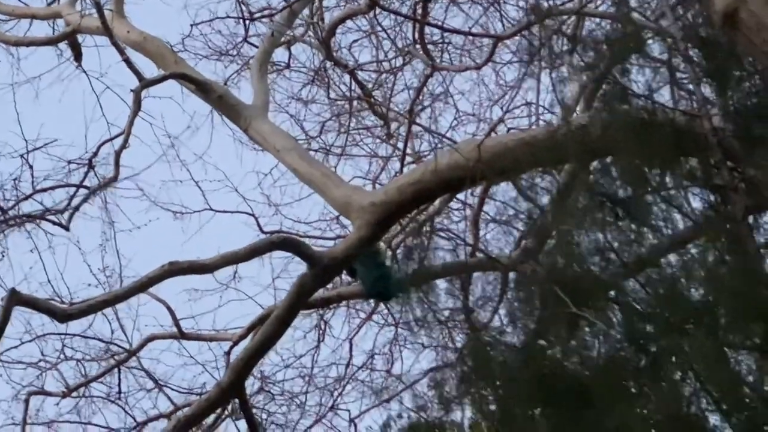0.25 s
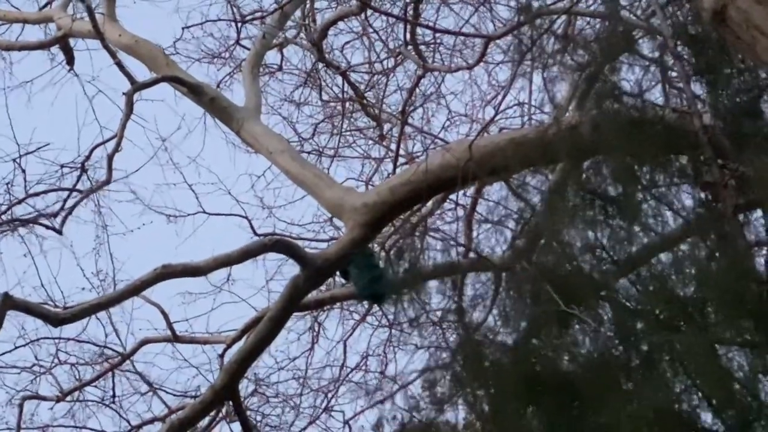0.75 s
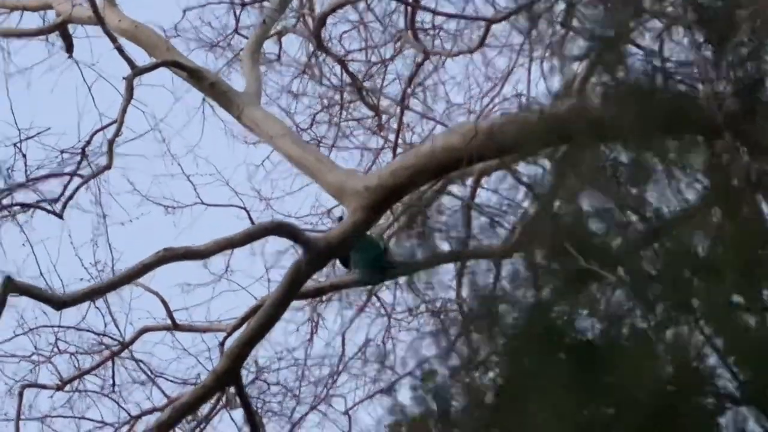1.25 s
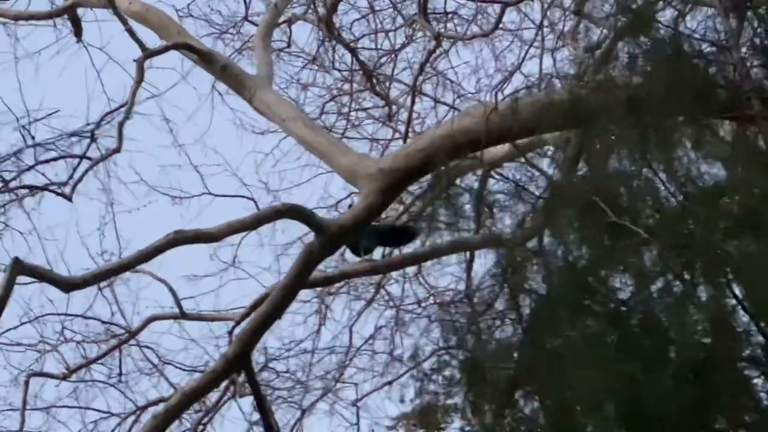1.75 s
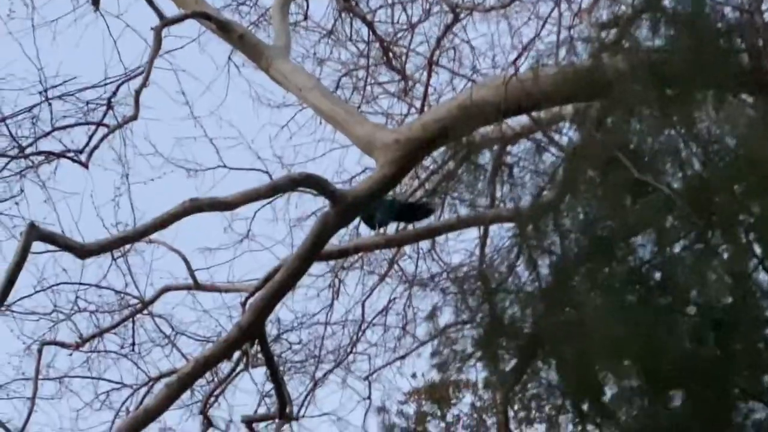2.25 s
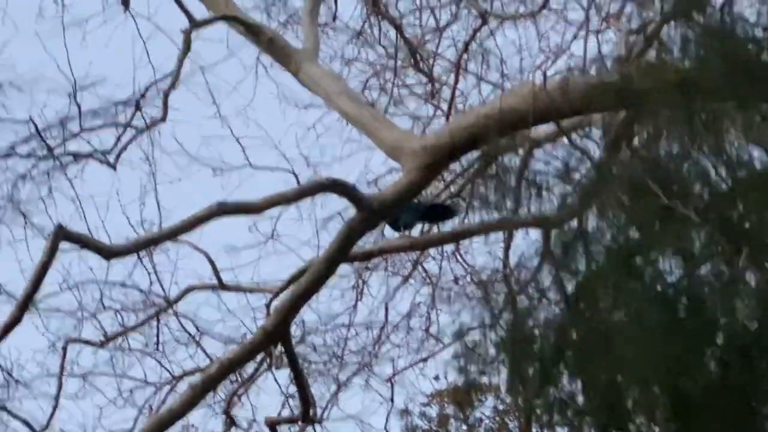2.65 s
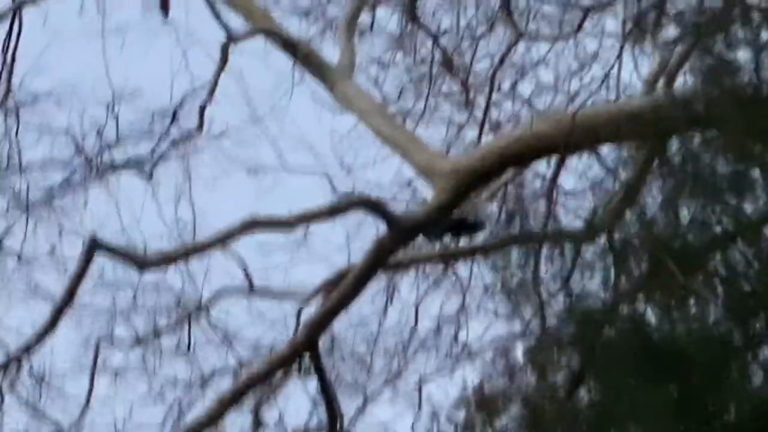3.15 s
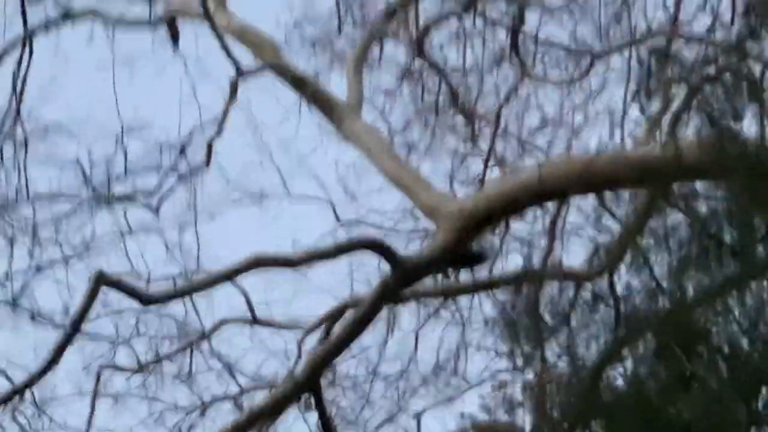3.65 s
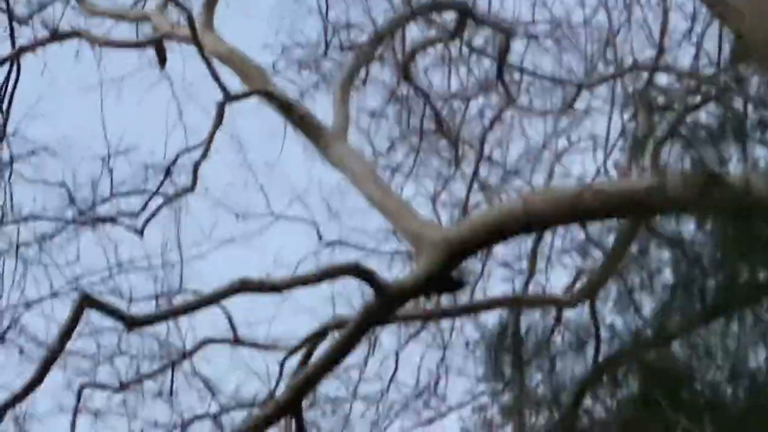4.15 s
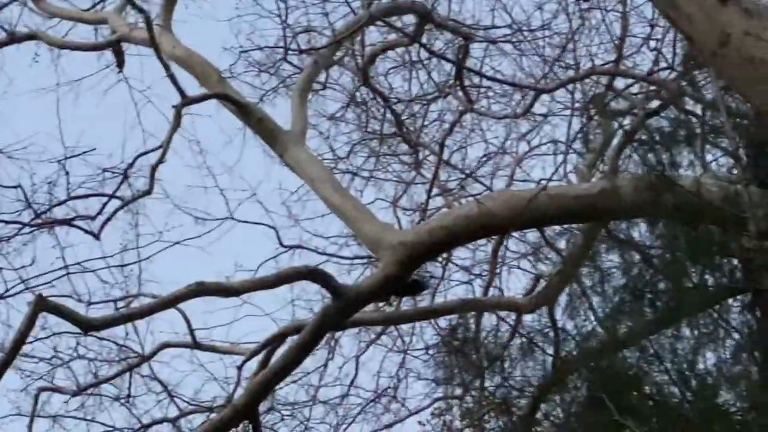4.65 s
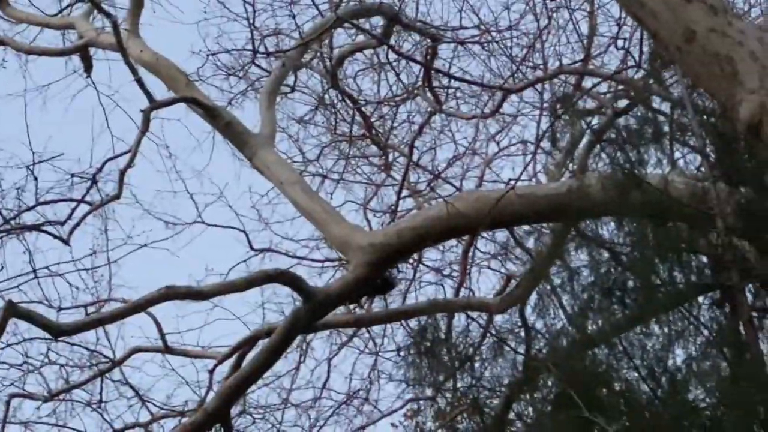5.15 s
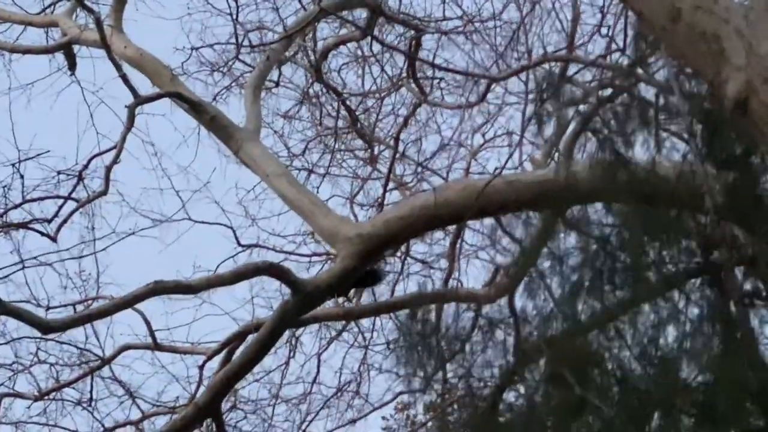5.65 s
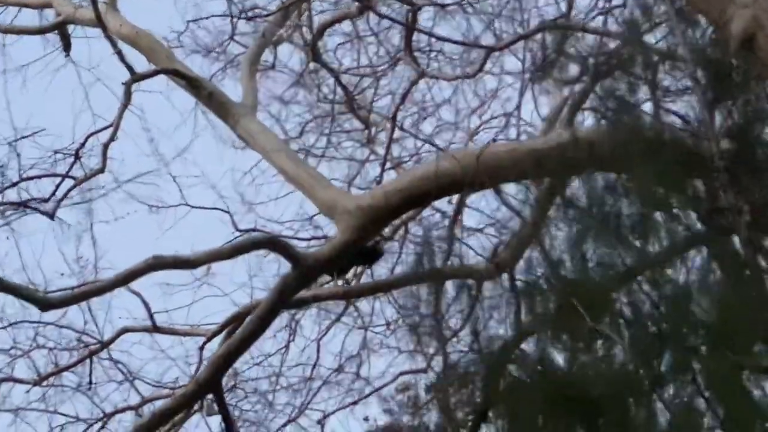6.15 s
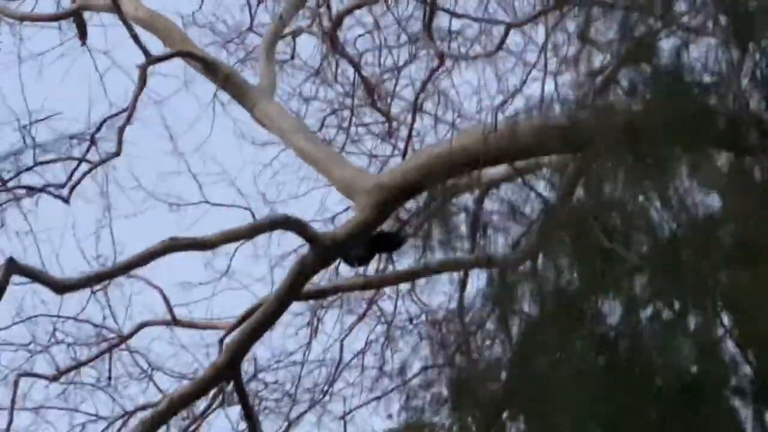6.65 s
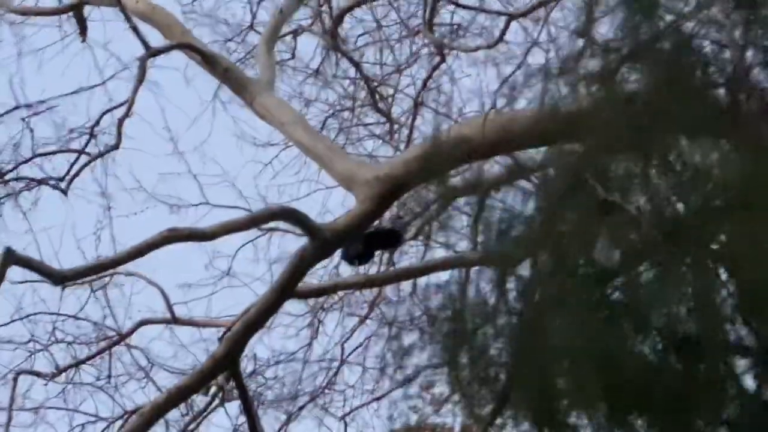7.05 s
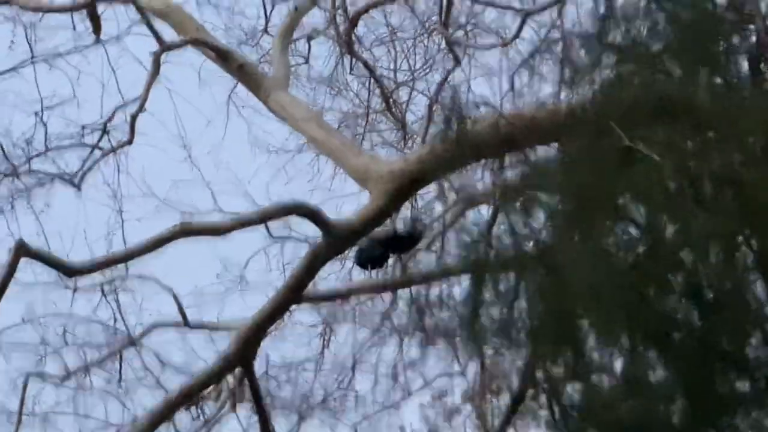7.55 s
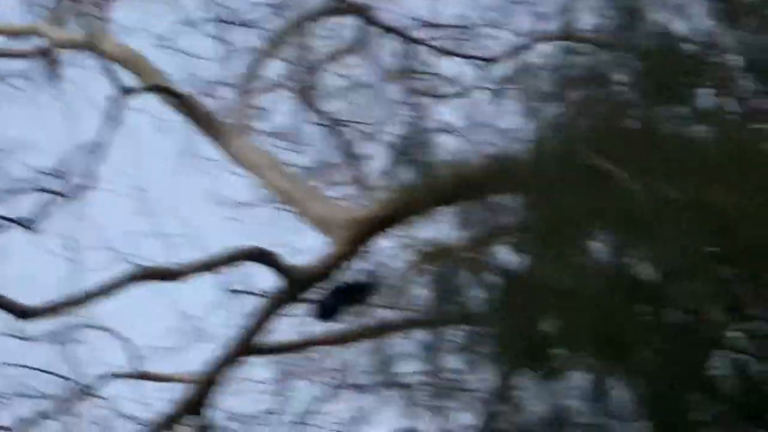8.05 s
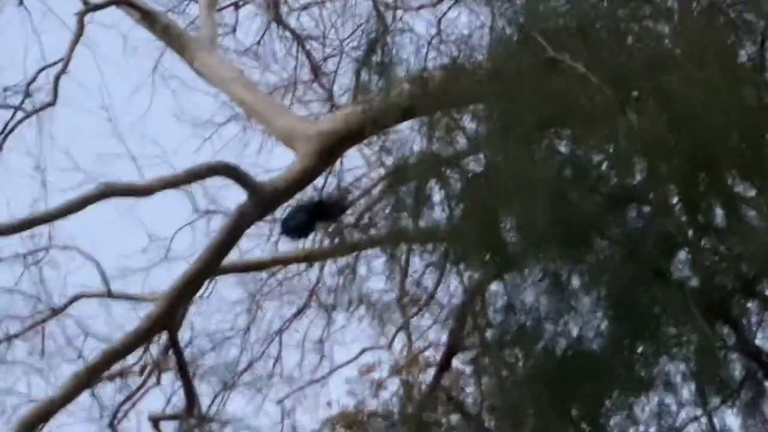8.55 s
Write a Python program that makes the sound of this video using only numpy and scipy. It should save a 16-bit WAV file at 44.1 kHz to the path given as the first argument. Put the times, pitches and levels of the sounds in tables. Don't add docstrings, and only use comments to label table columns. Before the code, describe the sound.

A peacock high in a bare tree calls loudly: a brief rattling start, one long falling wail, then six shorter nasal cries that break upward and drop, about one each second. Close trunks give quick echoes and a slope a faint late tail. Distant water hisses softly over low rumble. The hand-held camera's plastic case knocks, ticks and creaks very close in stereo.

```python
import sys
import numpy as np
from scipy import signal
from scipy.fft import rfft, irfft, next_fast_len
from scipy.io import wavfile
from scipy.ndimage import uniform_filter1d, map_coordinates

SR = 44100
rng = np.random.default_rng(int(sys.argv[2]) if len(sys.argv) > 2 else 0)


def attenuation_scalar(level_db):
    decades = np.asarray(level_db, float) / 20
    return 10 ** decades


def unload_audio(sound):
    columns = np.transpose(np.atleast_2d(sound))
    steps = np.round(np.clip(columns, -1, 1) * 32767)
    wavfile.write(sys.argv[1], SR, steps.astype(np.int16))


N = 388080

# t/s, level/dB
RUMBLE_LEVEL = [(0.0, -57.5), (1.35, -54.5), (1.62, -53), (2.15, -55.5), (3.5, -54), (5.1, -57),
                (5.2, -54.5), (7.38, -54), (7.67, -51), (7.94, -55.5), (8.48, -53.5), (8.8, -55)]
# f/Hz, level/dB
RUMBLE_SPECTRUM = [(12, -48), (20, -27), (38, -7.5), (57, 3), (75, 6.5), (119, 0.5), (236, -12.5),
                   (260, -12), (340, -31), (570, -120)]
WATER_SPECTRUM = [(90, -25), (170, -1), (630, 3), (1000, -4), (2000, -10.5), (2600, -16), (4000, -24),
                  (6300, -40.5), (10000, -48.5), (12500, -58), (13500, -80.5)]
CLOTH_SPECTRUM = [(2650, -32), (4500, -5), (5820, -7.5), (7700, -4), (8380, -12), (11000, -12.5),
                  (13000, -29)]
# t/s, level/dB
SLEEVE_LEVEL = [
    (0.62, -103),
    (0.674, -72.5),
    (1.03, -77),
    (1.04, -82),
]
# f/Hz, likeness/1
AIR_ALIKE = [(30, .88), (60, 1), (130, 0.81), (290, 0.8), (640, 0.044), (1400, 0.48), (2200, 1),
             (4000, 0.77), (12000, 0.88)]
# t/s, shell peak level/dB, left over right/dB
THUDS = [(.865, -48, 18), (1.061, -32.5, 6), (1.156, -30.5, 3), (1.203, -37.5, 6), (1.325, -30.5, 6),
         (1.351, -34.5, 6), (6.25, -42.5, -8), (6.78, -36, 5), (7.002, -37, -8), (7.826, -33.5, 0),
         (7.967, -43.5, 0), (8.191, -33, -2), (8.397, -42.5, 1)]
TAPS = [(0.499, -56, 14), (1.575, -50, -8), (2.199, -50, -15), (2.207, -41.5, 2), (3.794, -46, 17),
        (3.835, -43, 12), (6.158, -45.5, -6), (6.415, -48, 1.5), (6.471, -53, 1.5), (6.56, -40.5, -4),
        (6.612, -47, -1), (7.415, -44, 14), (7.434, -43.5, 9), (7.468, -40, 7), (7.606, -41, -4),
        (7.653, -40, -5), (7.674, -37, 0)]
JOLTS = [(2.242, -39, 3), (5.167, -44, 4), (5.228, -51, -2), (7.376, -50, 4), (7.797, -51, 4),
         (8.234, -53, -3)]
# thump/dB, tick/dB
KNOCK_KINDS = [
    (-12, -22.5),
    (-11, -8),
    (2, -12),
]
# t/s, tick peak level/dB, shell/dB, snap/dB, left over right/dB
SLIPS = [(0.898, -34.5, 8.5, -24, 8), (2.015, -36.5, 13.5, -4, -3), (3.148, -34.5, -3, -16, 8),
         (3.156, -31, 1, -16, -11), (3.16, -30.5, -2, -20, 14), (3.164, -42, 2.5, -18, -6),
         (3.167, -36.5, -10, -23, -22), (3.208, -26, -4, -9.5, 7), (3.605, -30.5, -2, -21, 14),
         (5.622, -29.5, 4, -24, -10), (5.689, -40, -16, -16, -3)]
# start t/s, end t/s, first and last slip rate f/Hz, tick/dB, shell/dB, far port gain/1
SOFT_CREAKS = [
    (6.906, 7.11, 158, 35, -30, -43, 0.17),
    (7.215, 7.258, 106, 74, -39, -39.5, -0.23),
    (7.499, 7.735, 49, 45, -36.5, -38, -0.083),
    (8.189, 8.303, 56, 62, -52, -42, 0.13),
]
# start t/s, end t/s, slip rate f/Hz, tick peak level/dB, shell/dB
HARD_CREAK = [(8.503, 8.515, 160, -42.5, 1), (8.534, 8.556, 65, -37.5, 0.5), (8.601, 8.631, 125, -38, 4),
              (8.6365, 8.712, 59.8, -33, -2), (8.715, 8.75, 45.5, -44, -6), (8.757, 8.76, 116, -30.5, -19),
              (8.765, 8.766, 116, -37, -13), (8.775, 8.797, 116, -32.5, -12)]
# start t/s, end t/s, burst rate f/Hz, first f/Hz, last f/Hz, first level/dB, last level/dB
STUTTER = (.905, 1.075, 60.5, 655.5, 691.5, -44.5, -37.5)
# t/s, f/Hz
WAIL = [(1.02, 628), (1.049, 672), (1.085, 714), (1.19, 716.5), (1.298, 713), (1.42, 692), (1.72, 659),
        (1.861, 640.5), (1.998, 597.6)]
# t/s, f/Hz
ARCHES = [
    [(2.345, 562.5), (2.44, 615.7), (2.499, 592), (2.535, 715), (2.6, 753.7), (2.7, 776), (2.79, 790.5),
     (2.92, 715), (3.04, 609)],
    [(3.385, 574), (3.463, 646.4), (3.535, 624.6), (3.59, 797.7), (3.66, 810.4), (3.77, 800), (3.87, 756.7),
     (3.99, 684), (4.03, 613)],
    [(4.335, 589), (4.42, 668.4), (4.495, 647), (4.54, 761), (4.585, 789), (4.69, 784.7), (4.79, 745.6),
     (4.88, 685.7), (4.92, 619)],
    [(5.225, 597), (5.31, 685.7), (5.405, 709.7), (5.46, 777.8), (5.57, 789.3), (5.67, 762), (5.74, 723.3),
     (5.795, 684), (5.84, 609.5)],
    [(6.26, 584), (6.34, 676.4), (6.435, 723), (6.5, 783), (6.59, 797.5), (6.7, 790), (6.8, 748),
     (6.87, 693.5), (6.92, 618)],
    [(7.385, 595), (7.465, 666.3), (7.575, 732), (7.64, 779.7), (7.73, 799), (7.81, 789.2), (7.93, 755.4),
     (8.02, 701), (8.08, 606)],
]
# level/dB, throat f/Hz at start, at full voice, at end, sharpness/1
VOICES = [
    (-34.5, 1530, 1493, 1160, 4.18),
    (-35, 1780, 1680, 2080, 3.32),
    (-34.5, 1820, 2160, 2200, 2.02),
    (-34, 2140, 2380, 1920, 1.77),
    (-34.5, 2320, 2360, 1890, 2.44),
    (-34.5, 1990, 2280, 1960, 2.33),
    (-35, 2450, 2320, 1950, 2.23),
]
THROAT_MOVES = (0, .2, .3, .62, 1)
# f/Hz, level/dB
UPPER_COLOUR = [(2300, 21), (3000, 13), (3700, 5.5), (5500, 1.5), (7000, -2), (8500, -12), (12000, -12),
                (13300, -22), (15000, -14.5), (16000, -18)]
# f/Hz, width/Hz, level/dB
BEAK = (2960, 190, 7.7)
# f/Hz, t60/s
GROVE_DECAY = [(400, 0.063), (1500, 0.31), (3000, 0.33), (6000, 0.2), (10000, 0.49), (14000, 0.058)]
SLOPE_DECAY = [(400, 0.48), (2000, 1.085), (3500, 0.63), (6000, 0.4), (12000, 0.19)]
# f/Hz, level/dB
SCATTER = [(400, -9), (900, -7), (1500, -10), (2500, -1), (6000, 0)]
# f/Hz, likeness/1
ECHO_ALIKE = [(300, 0.9), (800, 0.2), (1500, 1), (3000, 0.86), (7000, 0.84), (14000, 0)]
# f/Hz, phase/rad
PORT_LEAD = [(500, .1), (800, .4), (1400, .28), (2400, .28), (4700, .45), (6000, -.3), (7700, .1),
             (8600, 2.2), (10400, .8), (12000, -1.2), (14000, -2.6)]

SILENT_DB = -120
FULL_HZ = 790


def unit(x):
    return x / np.sqrt(np.mean(x ** 2) + 1e-20)


def along(points, hz):
    f, v = np.transpose(points)
    return np.interp(np.log(hz + 1), np.log(f + 1), v)


def wobble(rate, count=1, at=np.arange(N)):
    knots = rng.standard_normal((count, N // 400))
    order = 3 if count == 1 else 1
    return np.squeeze([map_coordinates(row, [at * rate / SR], order=order) for row in knots])


def filtered(x, response):
    m = next_fast_len(x.shape[-1] + 8192)
    return irfft(rfft(x, m) * response(np.fft.rfftfreq(m, 1 / SR)), m)[..., :x.shape[-1]]


def spread(pair, alike):
    def mixing(hz):
        angle = np.arccos(np.clip(along(alike, hz), -1, 1)) / 2
        return np.array([np.cos(angle), np.sin(angle)])

    mid, side = filtered(pair, mixing)
    return np.array([mid + side, mid - side])


def rush(spectrum, patchy_db):
    z = signal.stft(rng.standard_normal((2, N)), nperseg=512)[2]
    field = uniform_filter1d(rng.standard_normal(z.shape[1:]), size=5, axis=0)
    field = unit(uniform_filter1d(field, size=10, axis=1))
    pair = signal.istft(z * attenuation_scalar(patchy_db * field), nperseg=512)[1][:, :N]
    pair = filtered(pair, lambda hz: attenuation_scalar(along(spectrum, hz)))
    return unit(spread(pair, AIR_ALIKE))


def air():
    t = np.arange(N) / SR
    rumble_db = np.interp(t, *np.transpose(RUMBLE_LEVEL))
    rumble = attenuation_scalar(rumble_db + 1.0 + 3.5 * wobble(7)) * rush(RUMBLE_SPECTRUM, patchy_db=-1.0)
    swell_db = 0.57 * (rumble_db - rumble_db.mean())
    water = attenuation_scalar(-53 + swell_db + 0.63 * wobble(1.7)) * rush(WATER_SPECTRUM, patchy_db=2.0)
    cloth_db = np.interp(t, *np.transpose(SLEEVE_LEVEL), left=-140, right=-140)
    return rumble + water + attenuation_scalar(cloth_db) * rush(CLOTH_SPECTRUM, patchy_db=2.5)


def bend(hz, late, cycles):
    u = np.arange(int(7 * SR / hz)) / SR * hz
    width = np.where(u < late, late / 2, cycles)
    return np.exp(-((u - late) / width) ** 2) * np.sin(2 * np.pi * (u - late + 0.17))


def panned(db):
    return attenuation_scalar([db / 2, -db / 2])


def knocks():
    hits = []
    for rows, (thump, tick) in zip((THUDS, TAPS, JOLTS), KNOCK_KINDS):
        for s, db, pan in rows:
            hits.append((s, SILENT_DB, db + tick + 2, db + tick + 10.5, db - 0.5, db + thump + 3.0, .9, panned(pan)))
    return hits


def sharp_slips():
    return [(s, SILENT_DB, db + snap, db - 2, db + shell - 19.5, db + shell - 20, .9, panned(pan))
            for s, db, shell, snap, pan in SLIPS]


def hard_creak():
    hits = []
    for start, end, rate, db, shell in HARD_CREAK:
        snap = -4 + 0.99 * max(db + 33, -10)
        for s in np.arange(start, end, 1 / rate):
            hits.append((s, db + 3.3 * snap - 0.5, db + snap + 1, db - 0.5, db + shell - 2.5, db + shell - 21,
                         2.6, panned(2.5)))
    return hits


def soft_creaks():
    hits, grip = [], wobble(30)
    for start, end, first, last, tick, shell, far in SOFT_CREAKS:
        at = np.arange(round(start * SR), round(end * SR))
        slips = np.cumsum(np.linspace(first, last, len(at)) * attenuation_scalar(0.58 * grip[at])) / SR
        when = np.interp(np.arange(slips[-1]), slips, at / SR)
        fade_db = rng.normal(0, 1.7, size=40) - 0.47 * np.arange(40)
        for s, d in zip(when, fade_db):
            hits.append((s, SILENT_DB, tick + d - 22, tick + d - 1.5, shell + d + 1.9, shell + d - 12,
                         .9, np.array([1, far])))
    return hits


def case():
    hits = knocks() + sharp_slips() + hard_creak() + soft_creaks()
    out = np.zeros((2, N + SR))
    for hit, r in zip(hits, rng.standard_normal(size=(300, 4))):
        s, crack, snap, tick, shell, thump, ring, ports = hit
        parts = [(crack, bend(5900, late=1.16, cycles=0.55)),
                 (snap, bend(2500 * attenuation_scalar(0.77 * r[0]), late=0.92, cycles=1.0)),
                 (tick, bend(1050 * attenuation_scalar(1.1 * r[1]), late=1.0, cycles=2.65)),
                 (max(shell - 7, tick - 4.5), bend(620 * attenuation_scalar(1.95 * r[0]), late=0.91, cycles=1.0)),
                 (shell, bend(340 * attenuation_scalar(2.07 * r[2]), late=1.26, cycles=ring)),
                 ((shell + thump) / 2 - 1.5, bend(190 * attenuation_scalar(3.1 * r[1]), late=1.17, cycles=0.58)),
                 (thump, bend(100 * attenuation_scalar(1.53 * r[3]), late=1.3, cycles=1.6))]
        for db, wave in parts:
            out[:, round(s * SR):][:, :len(wave)] += attenuation_scalar(db) * ports[:, None] * wave
    return out[:, :N]


def stutter():
    start, end, rate, first_hz, last_hz, first_db, last_db = STUTTER
    t = np.arange(0, end - start, 1 / SR)
    tone = np.sin(2 * np.pi * np.cumsum(np.linspace(first_hz, last_hz, len(t))) / SR)
    bursts = np.sin(np.pi * rate * t) ** 4 * tone
    return round(start * SR), bursts * attenuation_scalar(first_db + (last_db - first_db) * t / t[-1])


def throat(f, hz, sharp):
    return 1 / ((1 - (f / hz) ** 2) ** 2 + (f / hz / sharp) ** 2)


def partial_gains(k, pitch, age, throat_hz, sharp, upper_db, bloom_db, crack):
    slack_db = -.035 * (FULL_HZ - pitch) * np.log2(np.maximum(k * pitch / 4000, 1))
    gain = attenuation_scalar(along(UPPER_COLOUR, k * pitch) + slack_db) * (k * pitch < 16000)
    gain *= attenuation_scalar(upper_db) / np.sqrt(np.sum(gain ** 2 * (k * pitch > 3300), axis=0))
    firm = np.interp(np.maximum.accumulate(pitch) / pitch.max(), [0.727, 1], [2.29, sharp])
    first_hz, full_hz, last_hz = throat_hz
    targets = [first_hz, first_hz, full_hz, full_hz, last_hz]
    pipe = throat(k[:4] * pitch, np.interp(age / age[-1], THROAT_MOVES, targets), firm)
    octaves = np.log2(k[:4])
    effort_db = 0.0473 * (pitch - FULL_HZ)
    through = pipe / pipe[0] * attenuation_scalar(-6.5 * octaves)
    bypass = attenuation_scalar(-21)
    gain[:4] = attenuation_scalar(effort_db + bloom_db * octaves) * np.hypot(through, bypass)
    beak_hz, width_hz, beak_db = BEAK
    gain *= attenuation_scalar(beak_db * np.exp(-((k * pitch - beak_hz) / width_hz) ** 2))
    gain[4:] *= attenuation_scalar(-3 * uniform_filter1d(crack, size=400))
    return gain


def call(track, voicing, shake, leak, stall):
    db, *throat_hz, sharp = voicing
    k = np.arange(1, 27)[:, None]
    s, hz = np.transpose(track)
    at = np.arange(round(s[0] * SR), round(s[-1] * SR))
    t = at / SR
    age = t - s[0]
    glide = np.interp(t, s, hz)
    pitch = uniform_filter1d(glide, size=500, mode="nearest")
    slack = 0.79 + np.clip(FULL_HZ - pitch, 0, 150) / 90.5
    pitch = pitch * (1 + 0.0022 * slack * shake[at])
    flutter = np.clip((k - 1.4) / 4, 0, 1.7) * np.minimum(slack, 1.3) * wobble(55, count=26, at=at)
    flutter += (k > 2) * wobble(9, count=26, at=at)
    crack = np.clip(np.abs(np.gradient(glide)) * SR / 1400, 0, 2.2)
    rasp = 0.013 + .25 * np.clip(1 - age / .35, 0, 1)
    rasp += .9 * (1 - np.exp(-np.maximum(age - .37, 0) / .25))
    tired_db = -36 * np.maximum(age - .62, 0)
    bloom_db = -9 * np.exp(-age / 0.029)
    phase = 2 * np.pi * np.cumsum(pitch * (1 + 0.0091 * rasp * shake[-at])) / SR
    upper_db = -12.5 + 0.0639 * (pitch - FULL_HZ) + 3 * bloom_db + 0.92 * tired_db
    gain = partial_gains(k, pitch, age, throat_hz, sharp, upper_db, bloom_db, crack)
    gain *= 1 + np.where(k > 1, 1, .55) * rasp * stall[at]
    voice = np.sqrt(2) * np.sum(gain * attenuation_scalar(3.0 * flutter) * np.sin(k * phase + k * k / 9), axis=0)
    voice += attenuation_scalar(-30 + upper_db + 4.5) * (rasp + crack) * (1 + np.sin(phase)) * leak[at]
    edge = np.clip(np.minimum(age / 0.017, (s[-1] - t) / .013), 0, 1)
    return at[0], voice * edge * attenuation_scalar(db + tired_db)


def peacock():
    shake = wobble(80)
    leak = filtered(rng.standard_normal(N), lambda hz: attenuation_scalar(along(UPPER_COLOUR, hz)) * (hz > 900))
    leak = unit(leak)
    stall = np.sin(2 * np.pi * np.cumsum(56 * attenuation_scalar(1.6 * wobble(16))) / SR)
    calls = [call(track, voicing, shake, leak, stall) for track, voicing in zip([WAIL] + ARCHES, VOICES)]
    return calls + [stutter()]


def tail(decay, gap):
    hz, t, z = signal.stft(rng.standard_normal((2, SR + SR // 4)), SR, nperseg=256)
    level_db = along(SCATTER, hz)[:, None] - 60 * t / along(decay, hz)[:, None]
    answer = spread(signal.istft(z * attenuation_scalar(level_db), SR, nperseg=256)[1], ECHO_ALIKE)
    return np.roll(answer, int(gap * SR), axis=1) / np.linalg.norm(answer[0])


def echoed(calls):
    dry, wet = np.zeros(N), np.zeros((2, N + 3 * SR))
    for start, x in calls:
        dry[start:start + len(x)] += x
        paths = attenuation_scalar(-2.5) * tail(GROVE_DECAY, gap=.006) + attenuation_scalar(-16) * tail(SLOPE_DECAY, gap=.06)
        heard = signal.fftconvolve(x[None], paths, axes=1)
        wet[:, start:start + heard.shape[1]] += heard
    half_lead = np.array([[.5j], [-.5j]])
    ports = filtered(np.array([dry, dry]), lambda hz: np.exp(half_lead * along(PORT_LEAD, hz)))
    return attenuation_scalar(-1.5) * ports + wet[:, :N]


def scene():
    return air() + case() + echoed(peacock())


def top_cut(x):
    return signal.sosfilt(signal.butter(12, 16580, fs=SR, output="sos"), x)


def record(dry):
    return top_cut(dry)


dry = scene()
out = record(dry)
unload_audio(out)
```